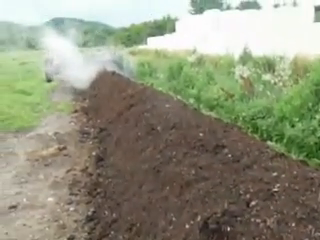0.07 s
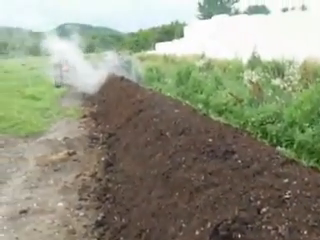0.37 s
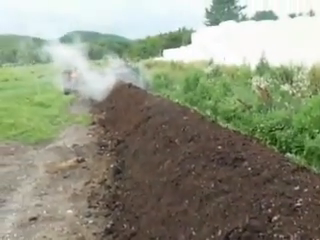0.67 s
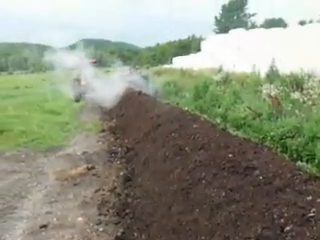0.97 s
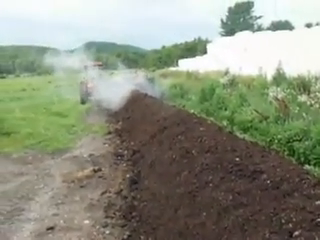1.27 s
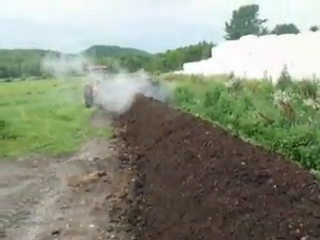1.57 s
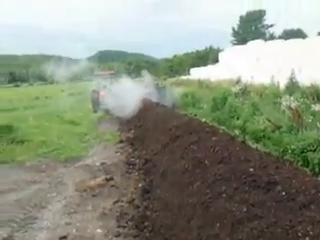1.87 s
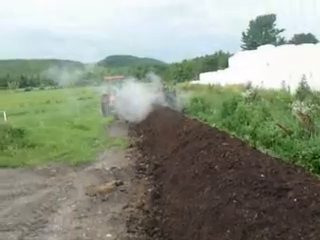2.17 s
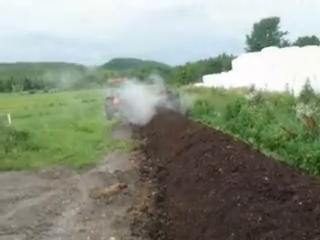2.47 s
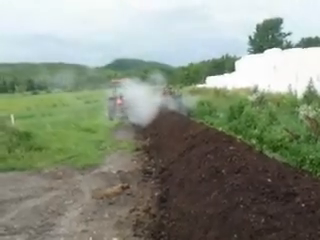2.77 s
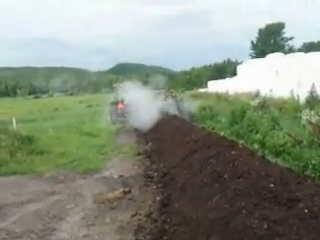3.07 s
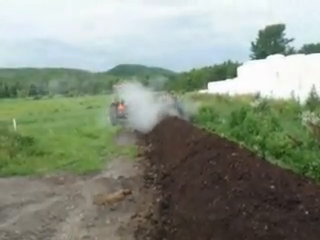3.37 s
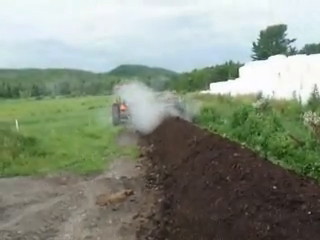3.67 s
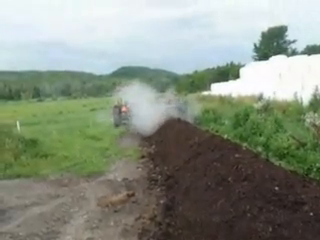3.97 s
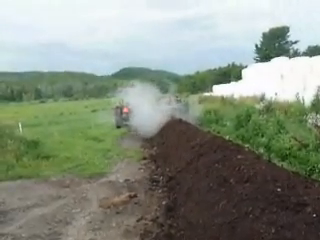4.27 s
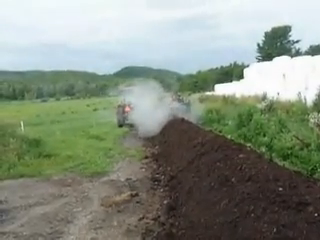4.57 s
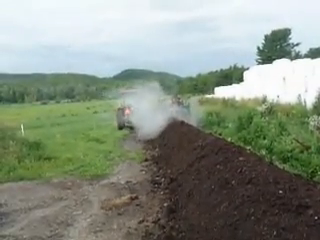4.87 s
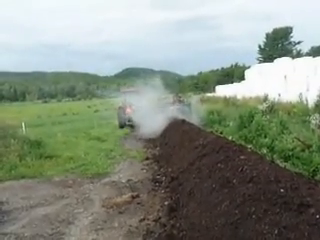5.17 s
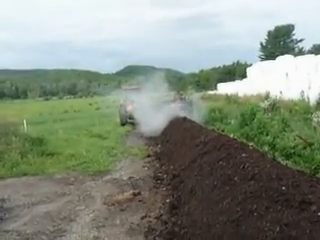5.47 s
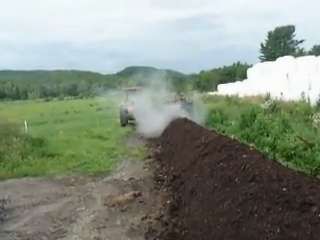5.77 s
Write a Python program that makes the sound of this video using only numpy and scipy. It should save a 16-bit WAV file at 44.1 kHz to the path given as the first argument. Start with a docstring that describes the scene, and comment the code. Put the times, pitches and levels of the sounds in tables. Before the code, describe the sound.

Outdoors, a compost turner tears through a pile with a continuous rush and light ticking, over the even drone and gear hum of the tractor pulling it. A thin metallic squeal pulses throughout, strongest around the middle. Sharp stone knocks and a few hollow thuds of clods on sheet steel come at uneven intervals. The machine is tens of metres away, heard through a small, muffled microphone that catches a few soft wind bumps.

```python
"""A diesel drone at steady revs, with clatter and gear hum, comes across a field from tens of metres off:
a tractor pulling a compost turner through a windrow. The knife rotor churns the heap and knocks on
stones; about once a turn steel rubs on steel with a thin squeal. Thrown clods sound the steel hood.
Close up, wind nudges the microphone of a small camera, which samples in mono at 8 kHz."""
import sys
import numpy as np
from scipy import signal
from scipy.fft import rfft, irfft, next_fast_len
from scipy.io import wavfile
from scipy.ndimage import uniform_filter1d

SR = 44100
rng = np.random.default_rng(int(sys.argv[2]) if len(sys.argv) > 2 else 0)


def transcribe(u):
    """Save the signal u as a 16-bit wav file named by the first command-line argument.

    u: samples, shape (n,) or (channels, n), limited to [-1, 1]; the rate is SR.
    q: integer samples, one column per channel.
    """
    v = np.clip(np.atleast_2d(u).T, -1, 1)
    q = np.round(v * 32767).astype(np.int16)
    wavfile.write(sys.argv[1], SR, q)


N = 265305
T = np.arange(N) / SR

# Table levels are relative: each source adds its own gain.
# engine speed: t/s, camshaft speed/rpm
CAM_SPEED = [(0.0, 971.3), (0.5, 972), (1.0, 973.5), (1.5, 968), (2.0, 965.4), (2.5, 970.4), (3.0, 969),
             (3.5, 973.2), (4.0, 965.8), (4.5, 966.9), (5.0, 966.4), (5.5, 971.1), (6.0, 971.2)]
# strongest engine tones: multiple of the camshaft rate, level/dB
ENGINE_TONES = [(3, -57), (9, -53), (12, -47), (13, -49), (15, -54), (16, -61), (17, -58), (19, -53),
                (20, -56), (23, -60), (24, -58), (27, -63), (33, -56), (36, -58), (42, -51.5), (48, -56),
                (49, -52), (50, -46.3), (55, -48), (73, -53), (77, -55), (83, -54), (90, -57), (98, -56),
                (99, -54)]
# drive line and rotor gears at mean speed: f/Hz, level/dB
GEAR_TONES = [(59.6, -57.5), (81.8, -49), (107.3, -42), (135.9, -54.5), (158.1, -48), (214, -47.5),
              (395.7, -55.5), (474.4, -56.5), (997.6, -50.5)]
# each cylinder's knock, in firing order: level/dB
CYLINDER_DB = [-1, -4, -4.5, -2, -1.5, -2]
# spectrum of the diesel clatter: f/Hz, level/dB
CLATTER_SPECTRUM = [(40, -21.5), (100, 6.5), (200, 3), (330, -1), (560, -3), (800, 0.5), (1050, -9.5),
                    (1200, 3.5), (1420, -12.5), (1600, 5.5), (1790, -10.5), (1920, -6), (2600, -20),
                    (3800, -29.5)]
# how hard the knives work: t/s, level/dB
KNIFE_LOAD = [(0, -39), (0.5, -38.5), (1.0, -36), (1.5, -37.5), (2.0, -38), (2.6, -37), (3.1, -37.5),
              (3.6, -38), (4.1, -36), (4.6, -37), (5.2, -37.5), (6.0, -37.5)]
# spectrum of the churned compost: f/Hz, level/dB
CHURN_SPECTRUM = [(20, -17.5), (50, -1.5), (100, -1.5), (170, -10.5), (255, -12), (310, -1.5), (380, -7.5),
                  (470, -8), (600, -13.5), (820, -8), (1650, -11), (1800, -14), (2900, -13), (3800, -20.5)]
# a second steel mode, singing faintly by itself: t/s, level/dB
OVERTONE_LEVEL = [(0, -51), (0.9, -55), (1.3, -45.5), (1.8, -48), (2.1, -53.5), (3.6, -50.5), (4.7, -59),
                  (5.05, -51.5), (6.0, -57)]
# the rotor rubs about once a turn: start t/s, length/s, level/dB
ROTOR_RUBS = [(0.072, .16, -38), (0.30, 0.298, -37.5), (0.682, 0.2205, -38), (0.965, .13, -35),
              (1.204, 0.1795, -35), (1.411, .21, -37.5), (1.678, .15, -36.5), (1.928, .15, -39),
              (2.13, 0.391, -39), (2.561, 0.1756, -34), (2.838, 0.139, -32.5), (3.095, 0.1396, -32.5),
              (3.335, .20, -33.5), (3.656, .14, -34.5), (3.901, .17, -36), (4.118, .14, -37.5),
              (4.344, 0.13, -41), (4.65, .20, -44), (4.945, .13, -41), (5.229, .12, -36.5),
              (5.451, .25, -37), (5.804, .24, -35.5)]
# weaker steel modes that sing with the squeal: f/Hz, level/dB re the squeal
WEAK_MODES = [(3058, -24), (3569, -28)]
# stones and clods on the knives, mostly at one point of the turn: t/s, crack level/dB, body level/dB
KNIFE_HITS = [(0.131, -27, -26.5), (0.402, -22, -25), (0.671, -25, -23.5), (0.778, -30.5, -27),
              (0.936, -23, -21), (1.2116, -26.5, -19), (1.5043, -29, -27.5), (1.771, -24.5, -26.5),
              (2.0443, -30, -34), (2.3103, -29, -29), (2.581, -26, -28.5), (2.608, -29, -21),
              (3.3965, -32, -29), (3.44, -32, -27), (3.4692, -29.5, -28), (3.691, -28.5, -25.5),
              (3.9608, -25, -22.5), (4.2225, -32, -25.5), (4.499, -26.5, -26), (4.5309, -21, -20),
              (4.78, -28, -28.5), (4.9984, -30, -43.5), (5.86, -28, -37.5)]
# spectrum of a knock's bright crack: f/Hz, level/dB
CRACK_SPECTRUM = [(1500, -30), (2300, -5), (2900, 7.5), (3250, 4), (3900, -23)]
# spectrum of a heavy knock's dull body: f/Hz, level/dB
BODY_SPECTRUM = [(200, -7.5), (500, -7.5), (850, -4), (1100, -6.5), (1350, -4), (1520, -8.5), (1650, 1.5),
                 (1780, -14), (1920, 0.5), (2100, -9), (2300, -3.5), (3200, -19.5)]
# clods thrown against the sheet-steel hood: t/s, level/dB
CLOD_HITS = [(0.437, -29), (0.689, -33), (0.995, -30.5), (2.621, -23), (3.973, -28.5), (4.54, -30),
             (4.791, -31), (5.861, -29.5)]
# modes of the hood: f/Hz, level/dB, t60/s
HOOD_RING = [(470.5, -1.5, 0.14), (508, -8, 0.07), (382, -8.5, 0.12), (647, -8, .06)]
# wind on the microphone: middle t/s, length/s, level/dB, centre f/Hz
WIND_BUFFETS = [(2.445, 0.019, -24, 82), (2.557, 0.013, -24.5, 115), (4.214, 0.01, -17, 124),
                (4.556, 0.012, -26, 110), (5.057, .1, -24, 129.8), (5.215, .035, -29.5, 141),
                (5.617, 0.012, -23, 180.1)]

CAMERA_HZ, OVERTONE_HZ = 8000, 2710  # sampling rate; second steel mode
SQUEAL_HZ, FIRM_RUB_DB = 2378, -37  # main steel mode at mean revs, under a rub this firm
SQUEAL_HZ_PER_RPM, SQUEAL_HZ_PER_DB = 1.178, 0.8


def undb(db):
    """Decibels to gain."""
    return 10 ** (np.asarray(db) / 20)


def unit(x):
    """Scale to rms 1."""
    return x / np.sqrt(np.mean(x ** 2))


def curve(table):
    """A (t/s, value) table at every sample."""
    return np.interp(T, *np.transpose(table))


def decay(t, t60):
    """An envelope that falls 60 dB in t60 seconds."""
    return np.exp(-np.log(1000) * t / t60)


def spell(start, length, ramp_s):
    """An envelope that rises, holds and falls; the ramps are centred on its two ends."""
    return np.clip(np.minimum(T - start, start + length - T) / ramp_s + .5, 0, 1)


def walk(rate_hz):
    """Random levels held 1 / rate_hz seconds and smoothed twice; spread near 1."""
    hold = int(SR / rate_hz)
    steps = np.repeat(rng.standard_normal(N // hold + 1), hold)
    return 1.3 * uniform_filter1d(uniform_filter1d(steps, hold), hold)[:N]


def colour(x, spectrum):
    """Filter by a (f/Hz, level/dB) spectrum within the camera's band, to rms 1."""
    hz, db = np.transpose(spectrum)
    size = next_fast_len(N)
    f = np.maximum(np.fft.rfftfreq(size, 1 / SR), 1)
    band = np.minimum(f / hz[0], 1) ** 2 * (f < CAMERA_HZ / 2)
    gain = undb(np.interp(np.log(f), np.log(hz), db)) * band
    return unit(irfft(rfft(x, size) * gain, size)[:N])


def noise(spectrum):
    """Coloured noise of rms 1."""
    return colour(rng.standard_normal(N), spectrum)


def sine(hz):
    """A tone of rms 1 on a moving pitch."""
    return np.sqrt(2) * np.sin(2 * np.pi * (np.cumsum(hz) / SR + rng.random()))


def add(track, start, sound):
    """Mix a sound into a track from start seconds on."""
    i = max(int(start * SR), 0)
    track[i:i + len(sound)] += sound[:N - i]


def scatter(x, t60):
    """Smear a sound with a short diffuse tail, as the hood and frame of the machine do."""
    t = np.arange(SR // 8) / SR
    return signal.fftconvolve(x, rng.standard_normal(len(t)) * decay(t, t60))[:N]


def drone(cam_hz, engine_db=-1, drive_db=-1.5, fade_db=3.0, slip=0.00294, shimmer_hz=1.623):
    """Engine and gear tones; each fades in and out by itself in the moving air over the field."""
    engine = sum(undb(db + fade_db * walk(8)) * sine(order * cam_hz + shimmer_hz * walk(24.94))
                 for order, db in ENGINE_TONES)
    shaft = cam_hz / cam_hz.mean() * (1 + slip * walk(7))  # the drive line winds up under the load
    drive = sum(undb(db + fade_db * walk(7)) * sine(hz * shaft) for hz, db in GEAR_TONES)
    return undb(engine_db) * engine + undb(drive_db) * drive


def clatter(cam_hz, db=-37, fresh=0.49, decay_firings=0.92, drift_rad=0.9, size=4096):
    """Six cylinders knock in turn; part of the rattle repeats each cycle, slowly changing; part is new."""
    cycle = (np.cumsum(cam_hz) / SR) % 1
    first, second = rng.standard_normal((2, size))[:, (cycle * size).astype(int)]
    blend = drift_rad * walk(2.963)
    repeating = np.cos(blend) * first + np.sin(blend) * second
    rattle = repeating + fresh * rng.standard_normal(N)
    firing = cycle * len(CYLINDER_DB)
    pulses = undb(CYLINDER_DB)[firing.astype(int)] * np.exp(-(firing % 1) / decay_firings)
    return undb(db) * colour(pulses * rattle, CLATTER_SPECTRUM)


def churn(surge_db=.5, flicker_db=0.6, crumb_db=-12, spread_db=4.5, crumb_t60=0.087, count=1200):
    """The knives tear through the heap: a surging rush and a patter of crumbs, both rising with load."""
    rush = noise(CHURN_SPECTRUM) * undb(surge_db * walk(3.92) + flicker_db * walk(25.12))
    signs = rng.choice([-1, 1], count)
    sizes = undb(spread_db * np.minimum(rng.exponential(size=count), 4))
    crumbs = np.zeros(N)
    crumbs[rng.integers(0, N, count)] = signs * sizes
    patter = colour(scatter(crumbs, crumb_t60), BODY_SPECTRUM)
    return undb(curve(KNIFE_LOAD)) * (rush + undb(crumb_db) * patter)


def overtone(flicker_db=3.0, waver_hz=10):
    """A second mode of the rubbing steel flickers above the squeal."""
    level = undb(curve(OVERTONE_LEVEL) + flicker_db * walk(22))
    return level * sine(OVERTONE_HZ + waver_hz * walk(35))


def rubbing(graze_db=-48, ramp_s=.03, sag_db=2.5, sag_hz=11, stutter_db=10):
    """Pressure and pitch drop of the rubbing rotor; level and pitch sag through each rub."""
    pressure, drop_hz = np.full(N, undb(graze_db)), np.zeros(N)
    for start, length, rub_db in ROTOR_RUBS:
        contact = spell(start, length, ramp_s)
        progress = np.clip((T - start) / length, 0, 1) - .5
        pressure = np.maximum(pressure, contact * undb(rub_db - sag_db * progress))
        drop_hz += sag_hz * contact * progress
    slips = np.clip(2 * (walk(55) - 1), 0, 1)  # now and then the steel loses its grip for an instant
    return pressure * undb(-stutter_db * slips), drop_hz


def squeal(ring_s=0.0083, waver=0.0014, flutter_db=2.0, wander_db=4.5):
    """Steel on steel sings in one strong mode and two weak ones; revs and pressure raise the pitch."""
    pressure, drop_hz = rubbing()
    pole = np.exp(-1 / (ring_s * SR))  # the mode takes a moment to build up and to die away
    swing = signal.lfilter([1 - pole], [1, -pole], pressure * undb(flutter_db * walk(60)))
    rpm = curve(CAM_SPEED)
    revs_hz = SQUEAL_HZ_PER_RPM * (rpm - rpm.mean())
    pressure_hz = SQUEAL_HZ_PER_DB * (20 * np.log10(pressure) - FIRM_RUB_DB)
    hz = (SQUEAL_HZ + revs_hz + pressure_hz - drop_hz) * (1 + waver * walk(60))
    bend = hz / hz.mean()
    weak = sum(undb(mode_db + wander_db * walk(9)) * sine(mode_hz * bend * (1 + .003 * walk(20)))
               for mode_hz, mode_db in WEAK_MODES)
    return swing * (sine(hz) + weak)


def knocks(crack_db=-4, body_db=-1, crack_t60=0.071, body_t60=0.11, rise_s=0.001, rattle_s=0.0028,
           heavy_db=-25, ping_db=-7, next_knife_s=.031, next_knife_db=-9.5):
    """Each stone rattles through the knives for a few ms; only heavy ones bring out the dull body."""
    t = np.arange(SR // 4) / SR
    attack = 1 - np.exp(-t / rise_s)
    after_rattle = np.maximum(t - rattle_s, 0)
    crack, body = np.zeros(N), np.zeros(N)
    for start, bright_db, dull_db in KNIFE_HITS:
        strike = undb(bright_db + crack_db) * attack * decay(after_rattle, crack_t60)
        add(crack, start, strike)
        add(crack, start + next_knife_s, undb(next_knife_db) * strike)  # same stone, next knife
        weight_db = dull_db + min(dull_db - heavy_db, 0)
        add(body, start, undb(weight_db + body_db) * attack * decay(after_rattle, body_t60))
    crack_ring = unit(np.tanh(noise(CRACK_SPECTRUM) / 2))  # dense, without lone spikes
    body_ring = unit(np.tanh(noise(BODY_SPECTRUM) / 2))
    ping = undb(ping_db) * sine(OVERTONE_HZ * (1 + 0.0092 * walk(40)))  # a blow rings this mode too
    return crack * (crack_ring + ping) + body * body_ring


def grit(softest_db=-41, range_db=6.0, t60=0.064, count=9):
    """Grit ticks lightly on the knives at any moment."""
    t = np.arange(SR // 8) / SR
    level = np.zeros(N)
    for when, strength in rng.random((count, 2)):
        add(level, when * N / SR, undb(softest_db + range_db * strength) * decay(t, t60))
    return level * noise(CRACK_SPECTRUM)


def hood(gain_db=7, push_s=0.0058, detune_hz=2):
    """Soft clods push slowly on the hood, which answers with a short hollow note."""
    t = np.arange(SR // 3) / SR
    push = 1 - np.exp(-t / push_s)
    out = np.zeros(N)
    for start, hit_db in CLOD_HITS:
        ring = np.zeros(len(t))
        for hz, mode_db, t60 in HOOD_RING:
            cycles = (hz + detune_hz * rng.standard_normal()) * t + rng.random()
            ring += undb(mode_db) * decay(t, t60) * np.sin(2 * np.pi * cycles)
        add(out, start, undb(hit_db + gain_db) * push * ring)
    return out


def wind(ramp_s=.011, swirl=.27, gusting_db=2.5):
    """Each eddy shakes the microphone for a cycle or two; a longer gust tumbles in pitch and strength."""
    tumble = np.exp(swirl * walk(130))
    strength = undb(gusting_db * walk(110))
    return strength * sum(undb(db) * spell(middle - length / 2, length, ramp_s) * sine(hz * tumble)
                          for middle, length, db, hz in WIND_BUFFETS)


def scene(hunting=.0012):
    """Tractor and turner across the field, wind right at the microphone."""
    cam_hz = curve(CAM_SPEED) / 60 * (1 + hunting * walk(8))  # the governor hunts slightly
    tractor = drone(cam_hz) + clatter(cam_hz)
    turner = churn() + squeal() + overtone() + knocks() + grit() + hood()
    return (tractor + turner + wind())[None]


def record(dry, top_hz=15400, dc_offset=.0115):
    """The camera samples at 8 kHz; cubic interpolation mirrors the sound faintly into the treble."""
    size = round(N * CAMERA_HZ / SR)
    coarse = np.pad(signal.resample(dry[0], size), (1, 3))
    position = np.arange(N) * size / N
    index, fraction = position.astype(int), position % 1
    taps = (-1, 0, 1, 2)
    cubic = np.zeros(N)
    for k in taps:
        weight = np.prod([(fraction - j) / (k - j) for j in taps if j != k], axis=0)
        cubic += weight * coarse[index + 1 + k]
    lowpass = signal.ellip(8, .2, 70, top_hz, fs=SR, output="sos")
    return signal.sosfilt(lowpass, cubic)[None] + dc_offset


dry = scene()
out = record(dry)
transcribe(out)
```